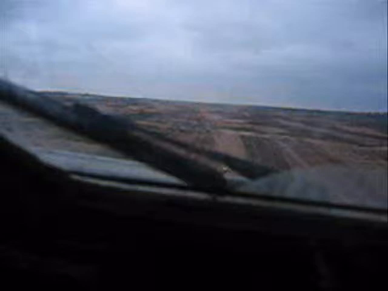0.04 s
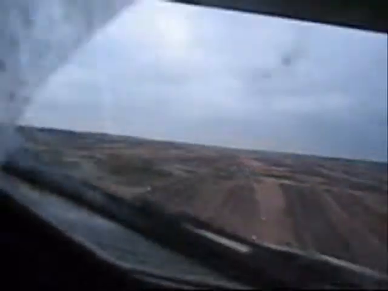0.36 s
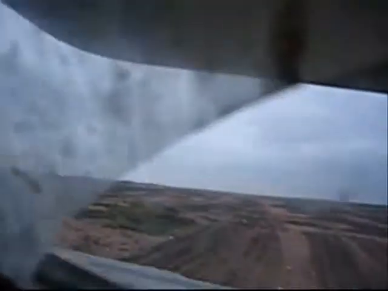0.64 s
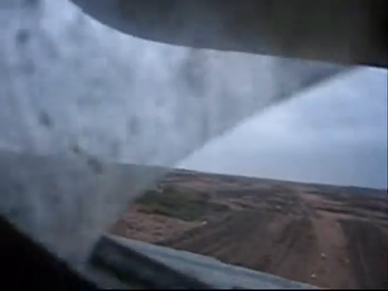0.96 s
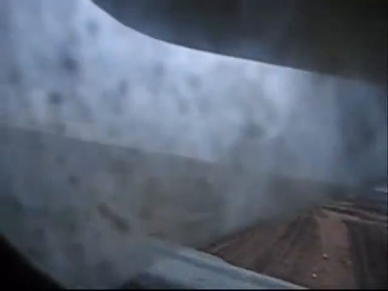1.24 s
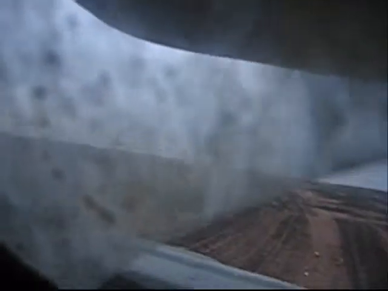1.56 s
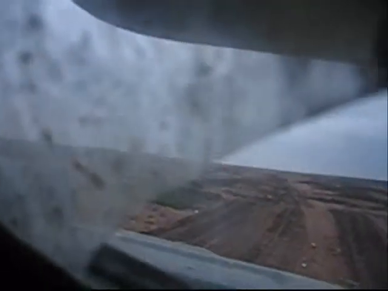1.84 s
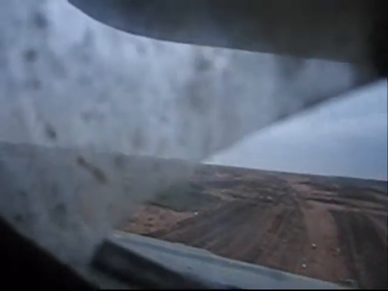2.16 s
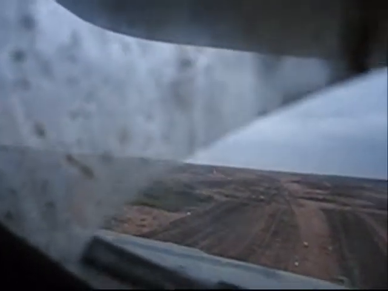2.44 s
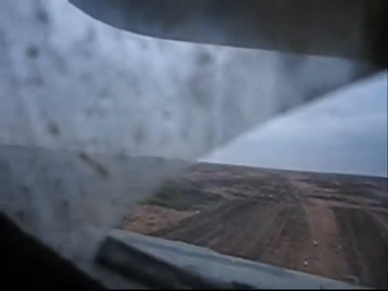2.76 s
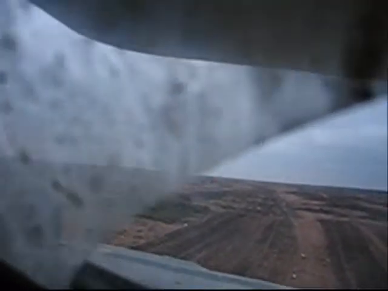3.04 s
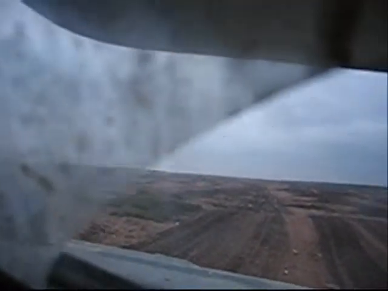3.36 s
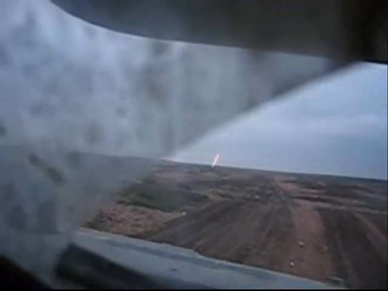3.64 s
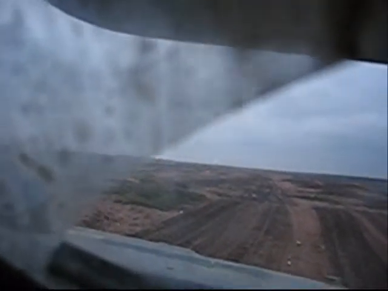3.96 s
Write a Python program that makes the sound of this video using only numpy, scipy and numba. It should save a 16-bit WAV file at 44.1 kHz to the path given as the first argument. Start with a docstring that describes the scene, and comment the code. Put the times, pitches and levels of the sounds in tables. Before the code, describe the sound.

Two bursts of machine gun fire ring through a moving armoured vehicle's cabin.

```python
"""A machine gun fires two bursts, heard inside an armoured vehicle driving over open ground.
Every shot rings the cabin the same way; bolt, belt and cases clatter differently each time.
Underneath, the engine booms in the hull, the running gear whines and the tracks rumble.
A small camera turns its gain down, overloads and stores the sound at a low sample rate."""
import sys
import numpy as np
from scipy import signal
from scipy.fft import rfft, irfft
from scipy.io import wavfile
from scipy.ndimage import uniform_filter1d
from numba import njit

SR = 44100
rng = np.random.default_rng(int(sys.argv[2]) if len(sys.argv) > 2 else 0)


def transcribe(u):
    """Save the signal u as a 16-bit wav file named by the first command-line argument.

    u: samples, shape (n,) or (channels, n), limited to [-1, 1]; the rate is SR.
    q: integer samples, one column per channel.
    """
    v = np.clip(np.atleast_2d(u).T, -1, 1)
    q = np.round(v * 32767).astype(np.int16)
    wavfile.write(sys.argv[1], SR, q)


N = 176400
T = np.arange(N) / SR

# Shot times in seconds.
SHOT_TIMES_S = [1.4513, 1.541, 1.6281, 1.7164, 1.8056, 1.8917, 1.9813, 2.0729, 2.1631, 2.2544, 2.3468,
                2.4349, 2.7771, 2.8728, 2.9639, 3.054, 3.1408, 3.2304, 3.3232, 3.4122, 3.5016, 3.5913,
                3.6821, 3.771, 3.861, 3.9537]


def undb(db):
    """Decibels to gain."""
    return 10 ** (np.asarray(db) / 20)


def unit(x):
    """Scale to rms 1."""
    return x / np.sqrt(np.mean(x ** 2))


def colour(x, curve):
    """Filter by a (Hz, dB) curve, rolled off at both ends; white noise keeps its power."""
    hz, db = np.array(curve).T
    f = np.fft.rfftfreq(len(x), 1 / SR) + 1e-3
    rolloff = np.sqrt((1 + (f / hz[-1] / 1.2) ** 12) * (1 + (.7 * hz[0] / f) ** 6))
    gain = undb(np.interp(np.log(f), np.log(hz), db)) / rolloff
    return irfft(rfft(x) * unit(gain), len(x))


def drift(rate_hz):
    """Smooth random drift, rms 1."""
    span = int(SR / rate_hz)
    steps = np.repeat(rng.standard_normal(N // span + 1), span)
    return unit(uniform_filter1d(uniform_filter1d(steps, span), span)[:N])


def convolve(x, response):
    """Convolution cut to N samples."""
    return signal.fftconvolve(x, response)[:N]


def ringing(modes, t60_s):
    """Impulse response of modes that fade together."""
    tones = sum(undb(db) * np.sin(2 * np.pi * (hz * T + rng.random())) for hz, db in modes)
    return tones * undb(-60 * T / t60_s)


def envelope(attack_s, hold_s, release_s):
    """Linear rise, exponential fade from time hold_s."""
    return np.minimum(T / attack_s, 1) * np.exp(-np.maximum(T - hold_s, 0) / release_s)


def reflections(attack_s, hold_s, release_s):
    """Packet of dense reflections with an even spectrum."""
    shape = envelope(attack_s, hold_s, release_s)
    x = rng.standard_normal(N) * shape
    for _ in range(6):  # flatten the spectrum, restore the envelope
        spectrum = rfft(x)
        x = irfft(spectrum / (np.abs(spectrum) + 1e-12), N)
        x = x * shape / np.sqrt(np.abs(uniform_filter1d(x ** 2, SR // 200)) + 1e-12)
    return x


def wandering_phase(hz, spread, rate_hz):
    """Phase in radians of a tone whose pitch drifts by the fraction spread."""
    return 2 * np.pi * np.cumsum(hz * (1 + spread * drift(rate_hz))) / SR


def vehicle():
    """The engine makes the hull boom and chug, the gear whines, the tracks jolt the hull's resonances."""
    # Drive levels. Each row: time in seconds, then boom, whine and track gain in dB.
    before_firing = [(.18, -6.5, -24.5, -31), (.42, -13.5, -20.5, -32.5), (.5, -10, -31.5, -34.5),
                     (.62, -10, -18.5, -30), (.86, -12, -18.5, -29), (.95, -13.5, -26.5, -34.5),
                     (1.08, -10, -17.5, -29.5), (1.15, -13, -25, -34.5), (1.3, -9.5, -17.5, -30)]
    from_first_burst = [(1.37, -12, -23, -32), (2.65, -12.5, -26, -32), (4, -13, -25, -32)]
    # Boom harmonics. Each row: multiple, relative level in dB.
    harmonics = [(1, -6), (2, -22), (3, -31.5)]
    # Hull resonances. Each row: centre in Hz, width in Hz, relative level in dB.
    hull_modes = [(212, 22, -1), (281, 44, 2.5), (434.5, 40, 3), (650, 31, -2)]
    # Track rumble spectrum. Each row: frequency in Hz, relative density in dB.
    rumble_curve = [(25, -17), (50, 7.5), (90, 3), (160, 4.5), (260, 2), (380, -8), (560, -8.5),
                    (850, -3.5), (1200, -16.5), (2400, -16), (3300, -26.5), (5400, -46)]
    times_s, *levels_db = np.vstack([before_firing, from_first_burst]).T
    boom_gain, whine_gain, track_gain = (undb(np.interp(T, times_s, db)) for db in levels_db)
    engine_phase = wandering_phase(hz=38.57, spread=.055, rate_hz=25.12)
    boom = sum(undb(db) * np.sin(order * engine_phase) for order, db in harmonics)
    boom = unit(boom * undb(1.6 * drift(40.07)))  # throb
    whine = np.sin(wandering_phase(hz=205, spread=.0273, rate_hz=29.92))
    whine = unit(whine * undb(3 * drift(46)))  # flutter
    jolts = undb(1.9 * drift(60.73) + .5 * np.sin(engine_phase))
    hull = np.zeros(N)
    for hz, width_hz, db in hull_modes:
        resonator = signal.iirpeak(hz, hz / width_hz, SR)
        hull += undb(db) * unit(signal.lfilter(*resonator, jolts * rng.standard_normal(N)))
    rumble = unit(colour(jolts * rng.standard_normal(N), rumble_curve))
    tracks = undb(9.5) * rumble + undb(1.5) * hull
    return boom_gain * boom + whine_gain * whine + track_gain * tracks


def clatter():
    """Bolt, belt links and cases strike in rough showers that ring the gun's steel."""
    # Strikes per firing cycle. Each row: offset from the shot in seconds, level in dB, decay in seconds.
    cycle = [(-.009, 0, 0.034), (.002, 0.5, 0.02), (0.027, 5.5, 0.031), (0.046, 0.5, 0.034)]
    # Lone clanks around the bursts. Each row: start in seconds, level in dB, decay in seconds.
    clanks = [(1.378, -14, 0.1), (1.426, -12.5, 0.018), (2.536, 1, 0.0051), (2.575, 6.5, 0.0027),
              (2.599, -6.5, 0.0047), (2.706, -13.5, 0.12), (2.752, -6.5, 0.02)]
    # Contact spectrum. Each row: frequency in Hz, relative density in dB.
    steel_curve = [(200, 1.5), (600, -0.5), (1100, 2), (2000, 1), (3000, -0.5), (4200, 2.5), (5400, 0.5),
                   (7000, -12)]
    # Steel resonances. Each row: frequency in Hz, relative level in dB.
    steel_modes = [(1626, -11), (2638, -8.5), (3792, -9), (4274, -28), (4937, -6)]
    scatter_s, scatter_db, attack_s, tail_db, tail_s = .0013, 1, .0047, -36, .086
    strikes = [(shot_s + offset_s + rng.normal(0, scatter_s), db + rng.normal(0, scatter_db), decay_s)
               for shot_s in SHOT_TIMES_S for offset_s, db, decay_s in cycle]
    power, age_s = np.zeros(2 * N), T[:SR // 2]
    for start_s, db, decay_s in strikes + clanks:
        start = int(start_s * SR)
        rise = np.minimum(age_s / attack_s, 1)
        fade = np.exp(-age_s / decay_s) + undb(tail_db) * np.exp(-age_s / tail_s)
        power[start:start + len(age_s)] += (undb(db) * rise * fade) ** 2
    contacts = np.sqrt(power[:N]) * rng.standard_normal(N) * undb(.5 * drift(500))
    ring = convolve(contacts, ringing(steel_modes, t60_s=.085))
    return colour(contacts, steel_curve) + undb(-8) * unit(ring) * np.std(contacts)


def shots():
    """Each round sends the same blast, recoil thud and cabin ring, with fresh gas roar and echo."""
    # Spectra of blast, turbulent gas, recoil thud and diffuse cabin echo.
    # Each row: frequency in Hz, relative density in dB.
    blast_curve = [(60, -7.5), (114, -19), (246, -4.5), (400, -10), (631, 0.5), (1000, -3), (1300, -5.5),
                   (1700, -9), (2600, -14), (5400, -15)]
    gas_curve = [(200, -3), (700, 1.5), (1400, -1.5), (2200, -1), (3200, -7), (5400, -11)]
    thud_curve = [(60, 3.5), (150, -3), (280, 3), (450, 6.5), (950, 8), (1400, -13), (3000, -2.5)]
    echo_curve = [(150, -17), (300, 5.5), (600, 1), (1050, 1), (1500, -14), (3000, -34)]
    # Cabin resonances. Each row: frequency in Hz, relative level in dB.
    cabin_modes = [(301, 11.5), (433, -15), (546, -24), (592, -29), (682, 6), (724, -19), (813, -2),
                   (945, -31), (985, 10.5), (1092, -11), (1131, -13), (1240, 14)]
    scatter_db, thud_delay_s, echo_decay_s = .8, .052, .11
    starts = (np.array(SHOT_TIMES_S) * SR).astype(int)
    pulses = np.zeros(N)
    pulses[starts] = undb(-scatter_db * rng.standard_normal(len(starts)))
    blast_packet = reflections(attack_s=.00594, hold_s=.027, release_s=.0068)
    blast = colour(convolve(pulses, blast_packet), blast_curve)
    gas_level = convolve(pulses, envelope(attack_s=.0033, hold_s=.02, release_s=.0036))
    gas = colour(gas_level * rng.standard_normal(N), gas_curve)
    recoil = reflections(attack_s=.011, hold_s=.012, release_s=.035)
    delayed_recoil = np.interp(T - thud_delay_s, T, recoil, left=0)
    thud = colour(convolve(pulses, delayed_recoil), thud_curve)
    cabin = convolve(pulses, ringing(cabin_modes, t60_s=.16)) / np.sqrt(len(cabin_modes))
    echo_power = np.abs(convolve(pulses, np.exp(-2 * T / echo_decay_s)))
    echo = colour(np.sqrt(echo_power) * rng.standard_normal(N), echo_curve)
    return undb(5.5) * blast + undb(4.5) * gas + undb(-.5) * thud + undb(-3) * cabin + undb(-9) * echo


@njit
def follow(x, attack_s, release_s):
    """Level follower with separate rise and fall times."""
    levels, level = np.empty(len(x)), 0.
    for i in range(len(x)):
        gap = abs(x[i]) - level
        level += gap / (SR * (attack_s if gap > 0 else release_s))
        levels[i] = level
    return levels


def scene():
    """Gun and vehicle, heard from the cabin, mono."""
    return (shots() + clatter() + vehicle())[None]


def record(dry):
    """Camera: gain control deaf to the bass, overload, sample-and-hold at a quarter of the rate."""
    threshold, ratio, ceiling = .048, 1.683, .53
    start_s, sidechain_hz, hold_samples, top_hz = .165, 670, 4, 15500
    sidechain = signal.sosfilt(signal.butter(2, sidechain_hz, "high", fs=SR, output="sos"), dry[0])
    level = follow(sidechain, attack_s=.0047, release_s=.047)
    gain = (threshold / np.maximum(level, threshold)) ** (1 - 1 / ratio)
    compressed = dry[0] * gain * (T > start_s)
    clipped = compressed / (1 + (compressed / ceiling) ** 6) ** (1 / 6)
    held = np.repeat(clipped[::hold_samples], hold_samples)[:N]  # mirrors the sound into the treble
    return signal.sosfilt(signal.ellip(12, .2, 90, top_hz, fs=SR, output="sos"), held)[None]


dry = scene()
out = record(dry)
transcribe(out)
```